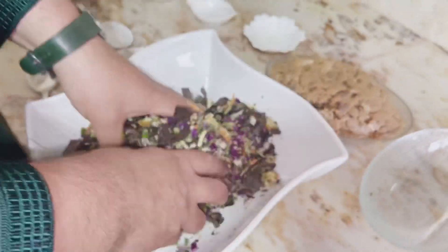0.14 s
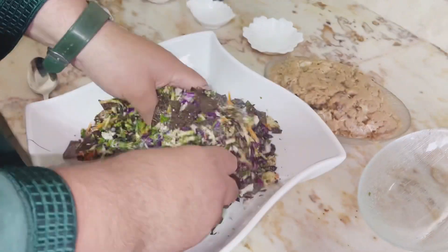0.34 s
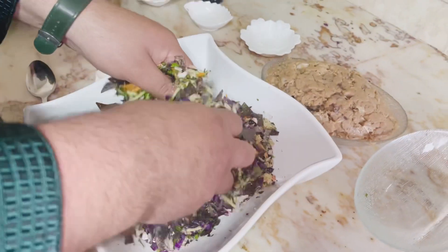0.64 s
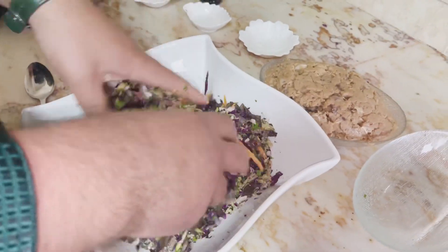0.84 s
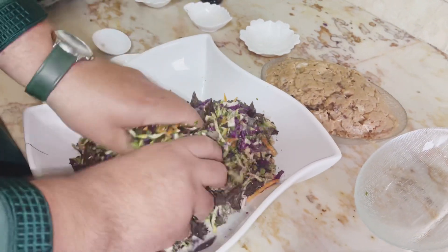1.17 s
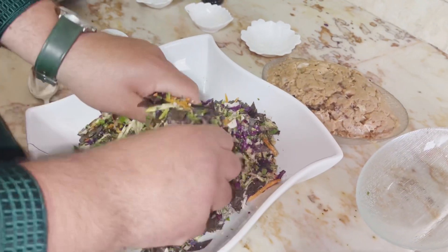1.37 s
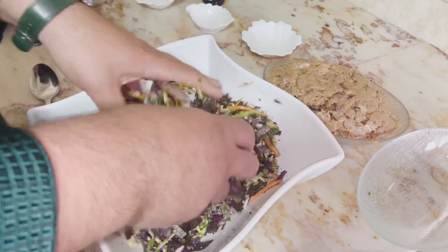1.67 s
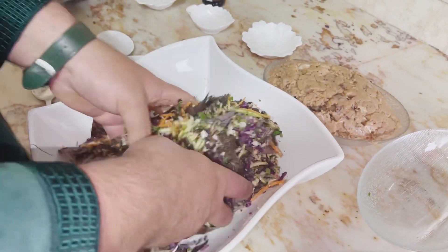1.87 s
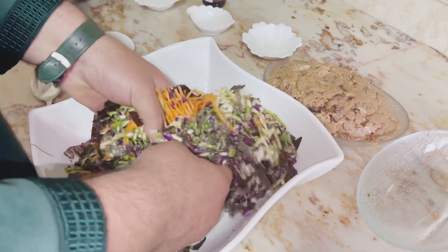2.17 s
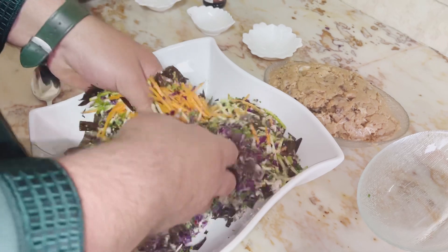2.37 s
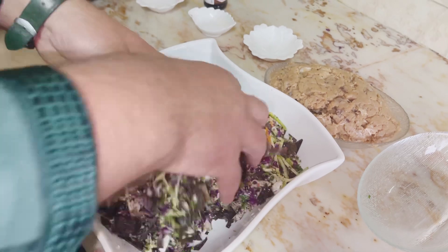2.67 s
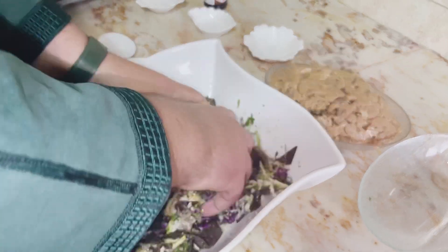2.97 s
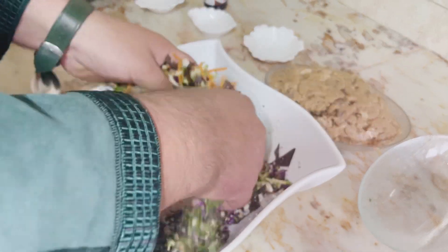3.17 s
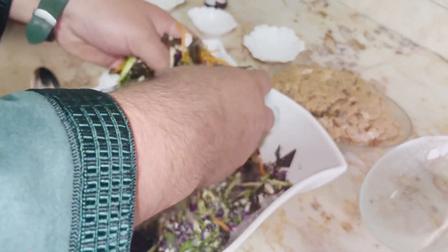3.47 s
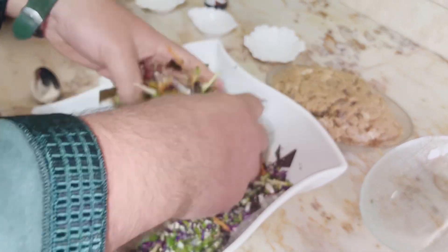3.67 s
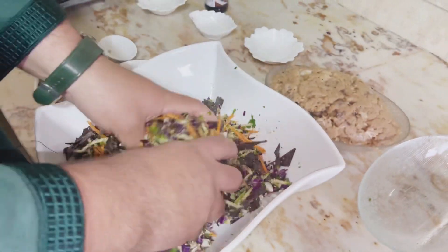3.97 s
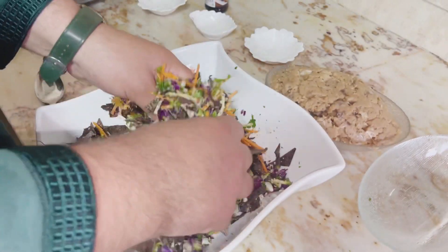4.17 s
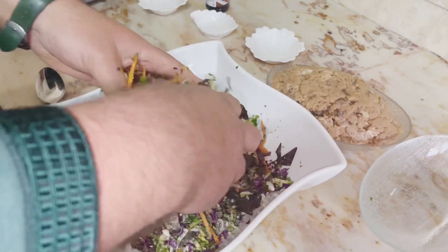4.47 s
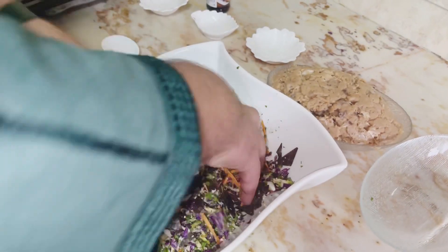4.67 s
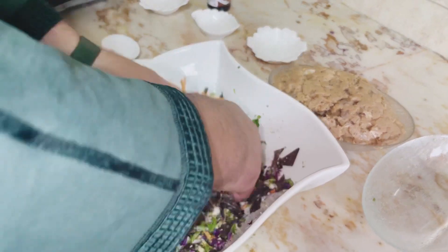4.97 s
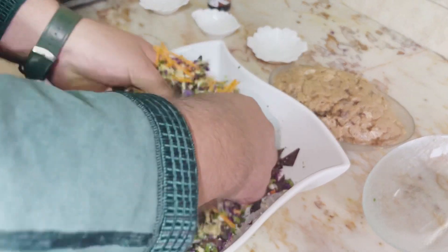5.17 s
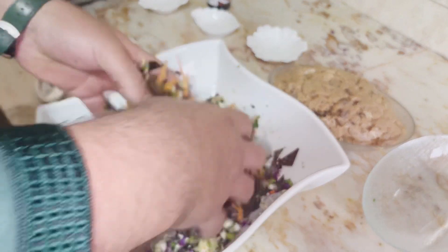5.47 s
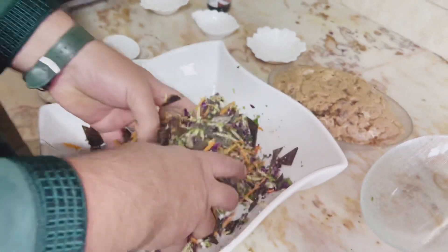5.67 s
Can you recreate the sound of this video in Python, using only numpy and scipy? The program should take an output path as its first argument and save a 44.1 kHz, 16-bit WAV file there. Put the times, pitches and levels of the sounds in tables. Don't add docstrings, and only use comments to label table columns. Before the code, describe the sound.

Close stereo sound in a hard-walled home kitchen, with short reflections and a bright but top-limited tone. The tail of an earlier knock is dying as a ceramic bowl bumps the worktop at 0.1 s. Hands toss shredded vegetables: low-level crisp rustling and dull damp rubbing, with clear little snaps around 0.3 s. A sharp double knock lands at 0.9 s. Handfuls rustle near 1.1 s, and a barely audible thin squeak passes around 1.5 s. Softer thumps follow at 1.7-1.8 and 2.1 s, then a lull near 2.5 s and a loud ringing double knock at 2.7 s. From 3 to 4.5 s only rustles, squeezes, faint resonant finger slides on glaze and small snaps remain. A strong knock at 4.64 s, a bright double rim clink at 4.76 s and a thud at 4.87 s cluster together. Quiet rustling continues to a last hollow knock at 5.64 s.

```python
import sys
import numpy as np
from scipy import signal
from scipy.fft import rfft, irfft, next_fast_len
from scipy.io import wavfile

SR = 44100
rng = np.random.default_rng(int(sys.argv[2]) if len(sys.argv) > 2 else 0)


def volts_from_db(level):
    exponent = np.asarray(level, float) / 20
    return 10 ** exponent


def pcm_store(signal):
    levels = np.round(np.clip(np.atleast_2d(signal), -1, 1) * 32767)
    wavfile.write(sys.argv[1], SR, levels.astype(np.int16).T)


N = 256662
LEAD_IN = SR // 5
LENGTH = N + LEAD_IN


def in_time(rows):
    s, *columns = np.transpose(rows)
    return [np.interp(np.arange(N) / SR, s, column) for column in columns]


def at_hz(points, hz, column=1):
    points = np.array(points)
    return np.interp(np.log(hz + 1), np.log(points[:, 0]), points[:, column])


def rms_one(x):
    return x / np.sqrt(np.mean(x ** 2) + 1e-20)


def drift(rate):
    knots = rng.standard_normal(400)
    return np.interp(np.arange(N) / SR * rate, np.arange(len(knots)), knots, period=len(knots))


def band(x, low_hz, high_hz):
    sos = signal.butter(2, [low_hz, min(high_hz, 0.45 * SR)], "band", fs=SR, output="sos")
    return signal.sosfilt(sos, x)


def ring(force, hz, t60):
    r = volts_from_db(-60 / (t60 * SR))
    w = 2 * np.pi * hz / SR
    return signal.lfilter([0, np.sin(w)], [1, -2 * r * np.cos(w), r * r], force + 1e-18)


# (frequency [Hz], t60 [s])
ROOM_DECAY = [(60, 0.8), (130, 0.35), (350, 0.66), (920, 0.5), (2400, 0.31), (6000, 0.31), (12000, 0.3)]


def kitchen(x):
    t = np.arange(int(0.9 * SR)) / SR
    white = rng.standard_normal((2, 2, len(t)))
    edges = 40 * 2 ** np.arange(0, 8.6, 0.5)
    swell = 1 - np.exp(-t / 0.0062)
    tail = 0
    for k, (low, high) in enumerate(zip(edges, edges[1:])):
        dying = volts_from_db(-60 * t / at_hz(ROOM_DECAY, np.sqrt(low * high))) * swell
        part = band(white[k % 2], low, high) * dying
        energy = np.sum(part ** 2, axis=1, keepdims=True)
        tail = tail + part * np.sqrt((high - low) / SR * 2 / energy)
    return volts_from_db(-1) * signal.fftconvolve(x, tail, axes=1)[:, :LENGTH]


def rustle(spectrum, per_s, grain_s, grain_db, patchy_db):
    sizes = volts_from_db(grain_db * np.minimum(rng.exponential(1, N), 5))
    contacts = sizes * (rng.random(N) < per_s / SR)
    gate = 1 + signal.lfilter([1], [1, -np.exp(-1 / (grain_s * SR))], contacts)
    white = rng.standard_normal((2, 2, N)) * gate
    together = drift(12)
    edges = np.geomspace(spectrum[0][0], spectrum[-1][0], 9)
    out = 0
    for k, (low, high) in enumerate(zip(edges, edges[1:])):
        flicker_db = patchy_db * (together + 0.61 * drift(22))
        gain = volts_from_db(at_hz(spectrum, np.sqrt(low * high)) + flicker_db)
        out = out + gain * band(white[k % 2], low, high)
    return rms_one(out)


# (frequency [Hz], level [dB per Hz])
RUMBLE_SPECTRUM = [(35, -23), (55, 3), (100, -6.5), (150, -4.5), (220, -14.5), (300, -0.5), (420, -30.5)]


def worktop_rumble(gain):
    return gain * rustle(RUMBLE_SPECTRUM, per_s=40, grain_s=0.02, grain_db=0, patchy_db=0.9)


# (start [s], end [s], frequency [Hz], wander [Hz])
SQUEAK_PASS = (1.37, 1.63, 4650, 120)


def squeak():
    start, end, hz, wander_hz = SQUEAK_PASS
    held, = in_time([(start - 0.02, 0), (start + 0.03, 1), (end - 0.03, 1), (end + 0.02, 0)])
    pitch = hz + wander_hz * drift(30)
    whistle = np.sin(2 * np.pi * np.cumsum(pitch) / SR)
    return held * volts_from_db(-71 + 5 * drift(50)) * whistle * [[1], [0.6]]


# (time [s], length [s], frequency [Hz], level [dB])
SLIDES = [(3.34, .03, 2205, -54), (3.33, .035, 3100, -59), (3.32, .025, 1250, -60), (3.33, .03, 8000, -69),
          (3.2, .04, 3000, -64), (3.67, .025, 2985, -56), (3.62, .03, 1000, -66), (3.87, .04, 980, -67),
          (4.25, .03, 790, -60), (4.45, .04, 1200, -65), (5.75, .02, 2800, -57), (5.75, .015, 4430, -66)]


def rubbing():
    out = np.zeros((2, N))
    t = np.arange(-8000, 8000) / SR
    for s, length, hz, db in SLIDES:
        tone = rms_one(ring(rng.standard_normal((2, len(t))), hz, 0.05))
        swell = np.exp(-(t / length) ** 2) * tone
        at = round((s + t[0]) * SR)
        out[:, at:at + len(t)] += volts_from_db(db) * swell[:, :N - at]
    return out


# (frequency [Hz], level [dB per Hz])
SOFT_SPECTRUM = [(300, 10.5), (500, -2), (800, 5.5), (1500, -2.5), (2200, -1), (2600, -0.5), (3000, -8),
                 (3500, -14), (4500, -19.5)]


def soft_rubbing(gain):
    return gain * rustle(SOFT_SPECTRUM, per_s=65, grain_s=0.002, grain_db=-11.5, patchy_db=1.5)


# (frequency [Hz], level [dB per Hz])
CRISP_SPECTRUM = [(2500, 3), (3500, 2), (5000, 3.5), (7000, -2), (8500, -1), (10000, -0.5), (13500, -6)]


def crisp_rustle(gain):
    return gain * rustle(CRISP_SPECTRUM, per_s=2500, grain_s=0.0006, grain_db=0.6, patchy_db=0.35)


# (time [s], peak level [dB], centre frequency [Hz], length [s])
BREAKS = [(0.2723, -33.5, 8000, 0.0017), (0.3104, -31, 8000, 0.0022), (0.5427, -41, 8000, 0.0022),
          (1.102, -41, 8000, 0.002), (1.2216, -42, 7840, 0.002), (1.298, -48, 8000, 0.0036),
          (1.4651, -47.5, 8100, 0.0016), (2.364, -47, 7970, 0.0025), (3.272, -56, 7850, 0.0033),
          (3.842, -42, 8250, 0.0018), (4.048, -45.5, 7650, 0.0022), (4.07, -46.5, 8100, 0.0025),
          (4.433, -48, 8100, 0.0023), (4.617, -40.5, 7630, 0.0051), (5.1124, -60, 8100, 0.0018)]


def snaps():
    out = np.zeros((2, N))
    t = np.arange(1200) / SR
    for s, db, hz, length in BREAKS:
        burst = band(rng.standard_normal((2, len(t))), hz / 2.2, hz * 1.6)
        at = round(s * SR)
        out[:, at:at + len(t)] += volts_from_db(db - 11) * burst * t / length * np.exp(1 - t / length)
    return out


def after_knocks(level_db, fall_s, power):
    force = np.zeros(LENGTH)
    s, db = np.transpose(EARLIER_BLOW + BLOWS)[:2]
    force[LEAD_IN + np.round(s * SR).astype(int)] = volts_from_db(2 * (db + level_db))
    r = np.exp(-1 / (fall_s / power * SR))
    swell = signal.lfilter([1], [1, -r], force + 1e-18)
    late = np.exp(-1 / (fall_s / 12 * SR))
    return signal.lfilter([1 - late], [1, -late], swell)[LEAD_IN:]


# (time [s], stirring as crisp rustle [dB], grip on the shreds [dB],
# leaning on the worktop [dB])
STIRRING = [(0.0, -60, -6, 13.5), (0.6, -67, 3.5, 2), (0.86, -65, 2, -3), (1.02, -62.5, 6, 0),
            (1.3, -67, -5, 2), (1.52, -68, 2.5, -3.5), (1.88, -64.5, -2, 5.5), (2.14, -70, 6.5, 3.5),
            (2.56, -76, 5, 6), (2.72, -65.5, 6.5, -0.5), (3.63, -70.5, 3, 4.5), (3.76, -64, 1, 7),
            (3.92, -69.5, -2.5, 1.5), (4.88, -68, 7, 9), (5.06, -69.5, 3, 4.5), (5.43, -69, 5, 6.5),
            (5.59, -67.5, 1, 12.5), (5.82, -66.5, 4.5, 7)]
# (time [s], width [s], level [dB])
LETTING_GO = [
    (1.255, 0.024, -7),
    (1.4, 0.067, -3.5),
    (2.46, 0.1, -8.5),
    (3.54, 0.037, -2.5),
    (4.02, 0.056, -4),
    (4.6, 0.016, -2.5),
    (5.07, 0.025, -2),
]
# (time [s], crisp level [dB], width [s], wetness [dB])
TOSSES = [(.12, -63.5, 0.1, 9), (.31, -59, 0.011, -8), (.39, -65.5, 0.026, -15), (1.1, -59.5, 0.034, 6),
          (1.22, -71, 0.015, 3), (1.7, -57, 0.024, 4.5), (1.8, -63, .025, 11), (1.95, -66.5, 0.074, 3),
          (2.37, -65.5, 0.021, -6), (2.6, -65.5, 0.15, 4.5), (3.341, -65, 0.043, 11),
          (3.61, -66.5, 0.025, 12.5), (3.68, -65.5, 0.033, 10), (3.87, -63.5, 0.053, 6.5),
          (4.071, -68, 0.022, -10.5), (4.45, -69.5, 0.031, 14), (5.11, -86, 0.022, 6),
          (5.54, -64.5, 0.083, -11)]


def hands():
    stir_db, press_db, lean_db = in_time(STIRRING)
    t = np.arange(N) / SR
    for s, width, db in LETTING_GO:
        stir_db = stir_db + db * np.exp(-((t - s) / width) ** 2)
    mean_db = stir_db.mean()
    swing_db = stir_db - mean_db
    soft_db = mean_db + 7 + 0.99 * swing_db + press_db
    rumble_db = mean_db + 5.5 + 0.5 * swing_db + lean_db
    crisp = volts_from_db(2 * stir_db) + after_knocks(level_db=-51.5, fall_s=0.047, power=1.4)
    soft = volts_from_db(2 * soft_db) + after_knocks(level_db=-39.5, fall_s=0.12, power=3.5)
    rumble = volts_from_db(2 * rumble_db) + after_knocks(level_db=-30.5, fall_s=0.15, power=2.18)
    for s, db, width, wet_db in TOSSES:
        swell = volts_from_db(2 * db) * np.exp(-((t - s) / width) ** 2)
        crisp = crisp + swell
        soft = soft + swell * volts_from_db(2 * wet_db)
    return volts_from_db(6) * np.sqrt(crisp), np.sqrt(soft), np.sqrt(rumble)


def strike(modes, times, levels_db, hardness_db, cut_hz, spread_db):
    out = np.zeros((2, LENGTH))
    soft = np.exp(-2 * np.pi * cut_hz / SR)
    chance = rng.standard_normal((len(times), len(modes), 5))
    at = LEAD_IN + np.round(times * SR).astype(int)
    for m, (hz, mode_db, t60) in enumerate(modes):
        both, left, right, *sign = chance[:, m].T
        luck_db = spread_db * (both + np.array([left, right]))
        db = levels_db + mode_db + hardness_db * np.log2(hz / 800) + luck_db
        force = np.zeros((2, LENGTH))
        force[:, at] = volts_from_db(db) * np.sign(sign)
        out[:, at[0]:] += ring(force[:, at[0]:], hz, t60)
    return signal.lfilter([(1 - soft) ** 2], [1, -2 * soft, soft ** 2], out + 1e-18)


# (frequency [Hz], level [dB per Hz])
SLAB_SPECTRUM = [(250, -29.5), (450, -2), (750, 8.5), (1000, -2.5), (1400, -6), (2300, -21), (3200, -30),
                 (3600, -32.5), (5500, -44.5), (7000, -59.5), (9000, -68.5)]


def thuds(times, levels_db, hardness_db, rise_s, fall_s):
    out = np.zeros((2, LENGTH))
    t = np.arange(2048) / SR
    hz = np.arange(1025) * SR / len(t)
    shape = (1 - np.exp(-t / rise_s)) * np.exp(-t / fall_s)
    for s, db, tilt_db in zip(times, levels_db, hardness_db):
        grit = rng.standard_normal(len(t))
        own = rng.standard_normal((2, len(t)))
        colour = volts_from_db(at_hz(SLAB_SPECTRUM, hz) + tilt_db * np.log2((hz + 100) / 800))
        burst = rms_one(irfft(rfft(grit + 0.62 * own) * colour))
        at = LEAD_IN + round(s * SR)
        out[:, at:at + len(t)] += volts_from_db(db) * burst * shape
    return out


# (time [s], peak level [dB])
TOUCHES = [
    (4.7605, -31),
    (4.765, -25),
]
# (frequency [Hz], level [dB], t60 [s])
RIM_MODES = [(1746, -1, 0.051), (2330, 3.5, 0.074), (2570, -4, 0.045), (3006, 5, 0.078), (3130, -3, 0.06),
             (3650, 0, 0.074), (3900, -15, .1), (4153, 2, 0.064), (4750, -7.5, 0.04), (5230, -9, .04),
             (5900, 0.5, 0.1), (5810, -9, 0.075), (5897, -13, 0.36), (6218, -11, 0.055), (6471, -3, 0.098),
             (7820, -7.5, 0.031), (9070, -8, 0.035), (10200, -6, 0.046), (11200, -8.5, 0.033)]


def clink():
    s, db = np.transpose(TOUCHES)
    tick = thuds(s - 0.003, db - 6.5, [7.5, 8.5], rise_s=0.0006, fall_s=0.011)
    return tick + strike(RIM_MODES, s - 0.002, db - 5.5, 0, cut_hz=8100, spread_db=-1.2)


# (time [s], peak level [dB], weight on the worktop [dB], bowl share [dB],
# hardness [dB per octave])
BLOWS = [(0.084, -16.5, 0.5, -6, 0), (0.839, -19.5, 0.5, -5, -2), (0.913, -9.5, -4.5, -16.5, 0.9),
         (0.918, -18, 3.5, -9, 6.5), (1.714, -20.5, 5, -13, 1), (1.734, -20.5, 0, -19, 0.5),
         (1.807, -22.5, 6.5, -5, -1.6), (2.115, -16.5, -1, -7.5, -0.9), (2.706, -8, -5.5, -3, 2.1),
         (2.713, -10, -2, -6.5, -11.5), (4.633, -17.5, 8.5, 2, 0.5), (4.64, -7, -8.5, -24, 2),
         (4.861, -21, 1.5, -23, 3), (4.869, -13.5, -0.5, -5, -2.6), (5.64, -12, 0.5, -2, -1)]
EARLIER_BLOW = [
    (-0.14, -22.5, 9, 0, 0.1),
]
# (frequency [Hz], level [dB], t60 [s])
WORKTOP_MODES = [(160, -13.5, 0.39), (240.8, 2.5, 0.073), (260.5, -0.5, 0.25), (293.4, 3, 0.12),
                 (317, -12, 0.45), (364.6, -6, 0.16), (468.3, -2.5, 0.15)]
BOWL_MODES = [(1123, -26.5, 0.027), (1224, -3, 0.12), (1343.6, -7.5, .13), (1759, -13.5, 0.18),
              (2216, -8, 0.078), (2321, -11.5, 0.14), (2550, -33, 0.028), (2760, -9, 0.11),
              (2912, -14, 0.13), (3120, -18.5, 0.06), (3970, -25, 0.039), (4870, -25.5, 0.0677)]
SLAB_MODES = [(513.4, -5, 0.11), (594.4, -6, 0.2), (717.6, -1.5, 0.095), (783.3, -2.5, 0.12),
              (876, -4.5, 0.19), (968.7, -4, 0.053)]
CABINET_MODES = [(59.4, -10, 0.36), (84, -20, 0.25), (102.7, -9, 0.65)]


def knocks():
    s, db, weight_db, bowl_db, hardness_db = np.transpose(EARLIER_BLOW + BLOWS)
    slab = thuds(s - 0.001, db - 1.5, hardness_db, rise_s=0.0016, fall_s=0.0069)
    worktop = strike(WORKTOP_MODES, s + 0.005975, db + weight_db - 12.5, 0, cut_hz=1580, spread_db=1.2)
    bowl = strike(BOWL_MODES, s, db + bowl_db - 2.5, hardness_db, cut_hz=2440, spread_db=2.45)
    cabinet = strike(CABINET_MODES, s + 0.015, db + weight_db - 11, 0, cut_hz=160, spread_db=-1.0)
    slab_ring = strike(SLAB_MODES, s, db - 10, hardness_db, cut_hz=2300, spread_db=2.0)
    return slab + slab_ring + worktop + bowl + cabinet


def scene():
    crisp_gain, soft_gain, rumble_gain = hands()
    shreds = soft_rubbing(soft_gain) + crisp_rustle(crisp_gain) + snaps()
    heavy, light = knocks(), clink()
    blows = heavy + light + kitchen(heavy + 0.67 * light)
    return worktop_rumble(rumble_gain) + squeak() + rubbing() + shreds + blows[:, LEAD_IN:]


# (frequency [Hz], level [dB])
HOUSING_COLOUR = [(20, -33), (38, -17), (52, -2), (8500, 2), (9800, 10), (11000, 10.5), (11600, 9),
                  (12100, 0), (12600, -7), (13200, -24.5)]
# (frequency [Hz], likeness [0-1], left minus right [dB])
PORT_LIKENESS = [(61.3, 1, -2.4), (130, 0.91, 1.5), (307, 0.89, 3), (634, 0.02, 2), (1320, 0.52, 2.5),
                 (2200, 0, -3.5), (2930, 0.54, -0.5), (3850, 0.6, -1), (6460, 0, 7.5), (7400, 0.6, -0.5),
                 (8700, 0.5, 1.5),
                 (9700, .9995, 0), (10450, .9995, 0), (11000, .88, 0), (11700, .95, 0)]
# (frequency [Hz], phase [turns])
PORT_PHASE = [(300, 0), (1200, .08), (2800, .5), (4500, 1), (6000, 1.5), (7400, 1.2), (8500, 1),
              (9850, .51), (10350, .49), (11700, 0)]


def two_ports(dry):
    size = next_fast_len(N + 4096)
    hz = np.arange(size // 2 + 1) * SR / size
    first, second = rfft(dry, size) * volts_from_db(at_hz(HOUSING_COLOUR, hz))
    ports = PORT_LIKENESS
    alike = np.clip(at_hz(ports, hz), 0, 1)
    tilt = volts_from_db(at_hz(ports, hz, column=2) / 2)
    shared = first * np.exp(-2j * np.pi * at_hz(PORT_PHASE, hz))
    right = alike * shared + np.sqrt(1 - alike ** 2) * second
    return irfft([first * tilt, right / tilt], size)[:, :N]


def top_cut(x):
    return signal.sosfilt(signal.butter(12, 13210, fs=SR, output="sos"), x)


def record(dry):
    mix = two_ports(dry)
    return top_cut(mix)


dry = scene()
out = record(dry)
pcm_store(out)
```